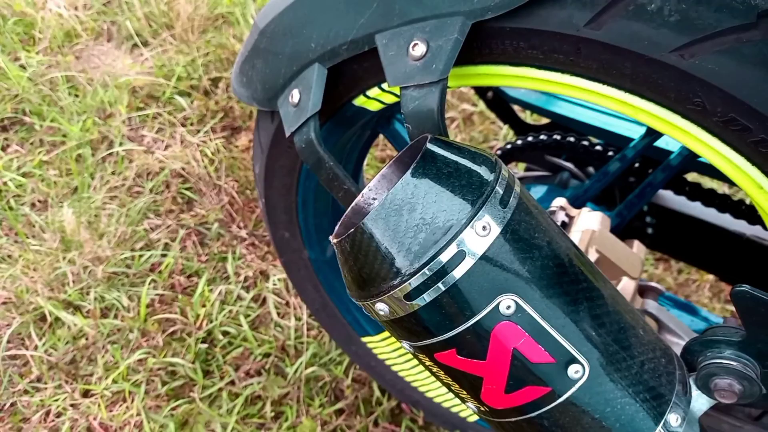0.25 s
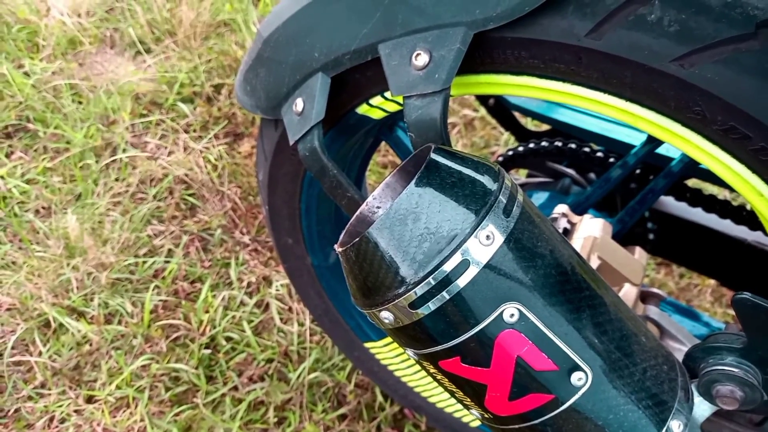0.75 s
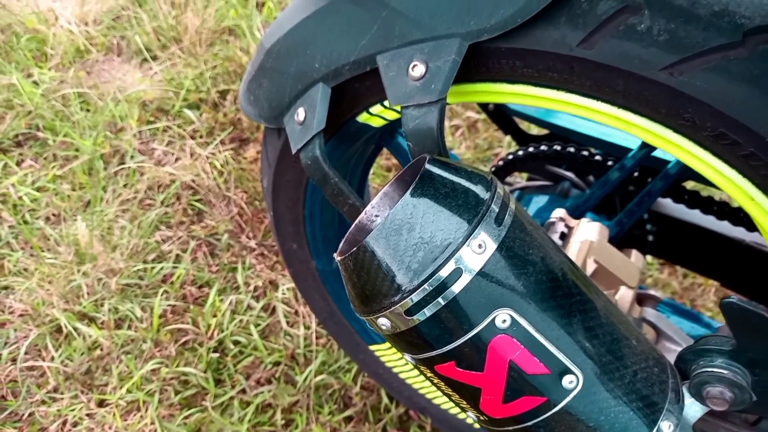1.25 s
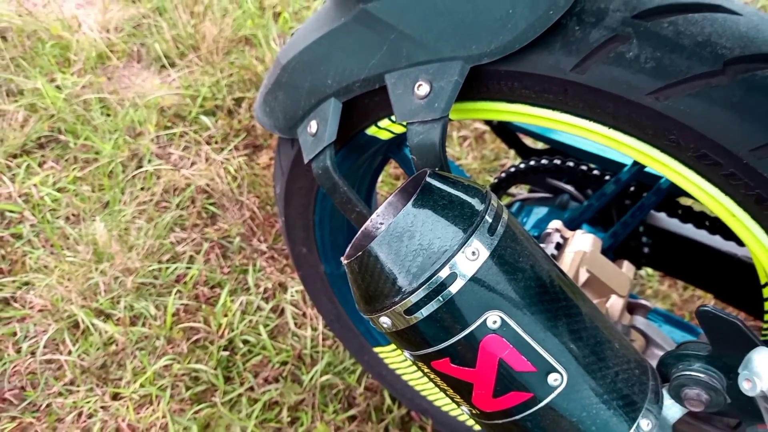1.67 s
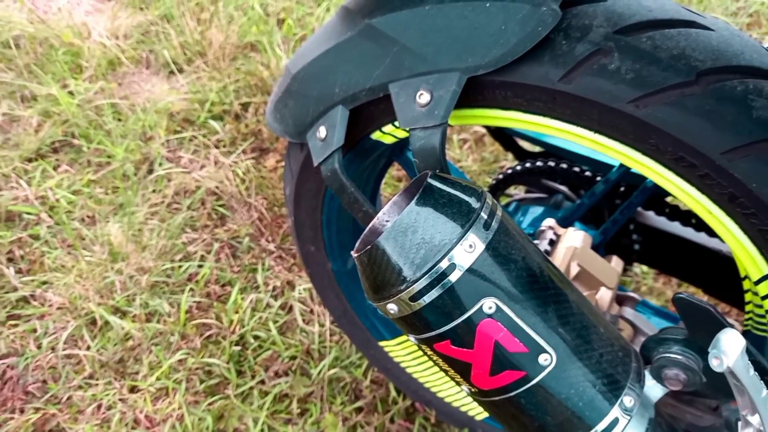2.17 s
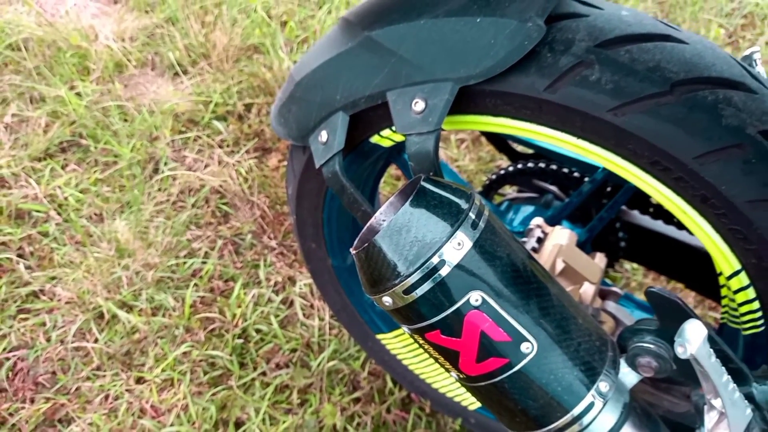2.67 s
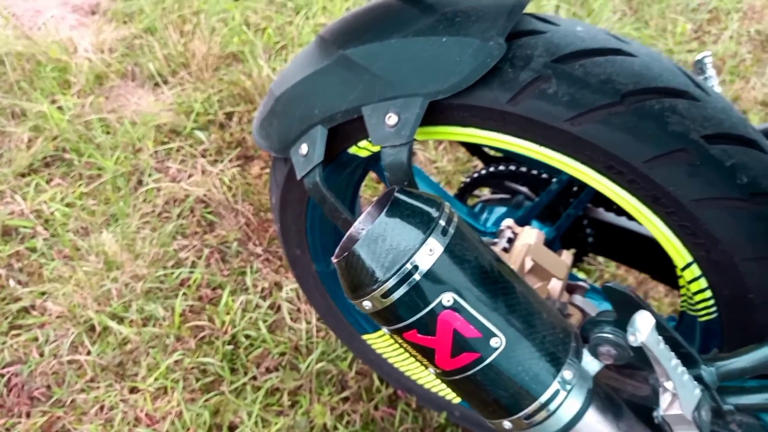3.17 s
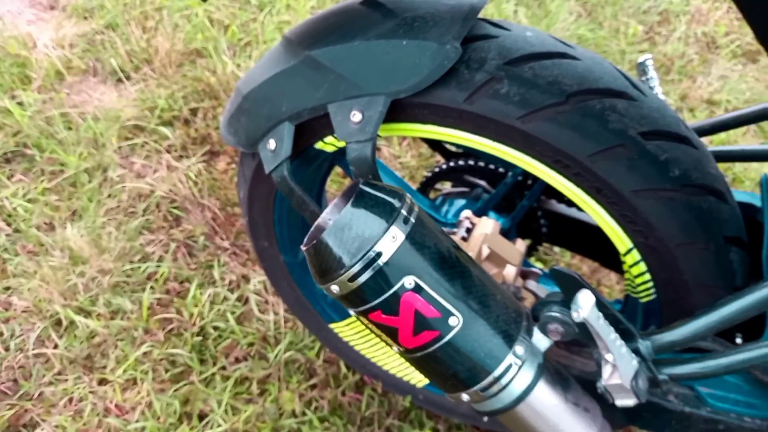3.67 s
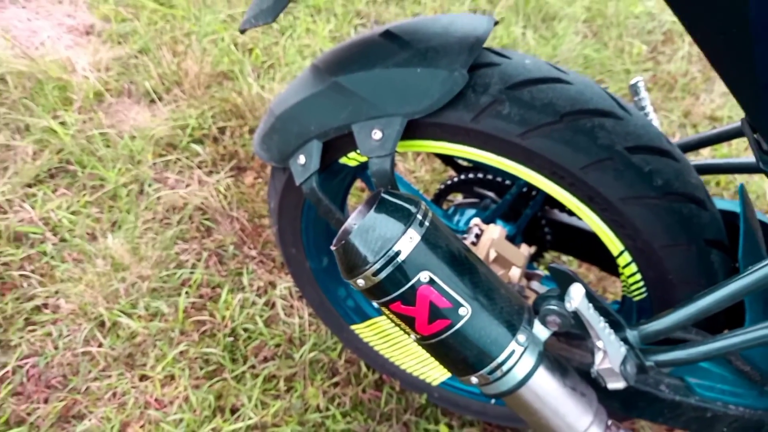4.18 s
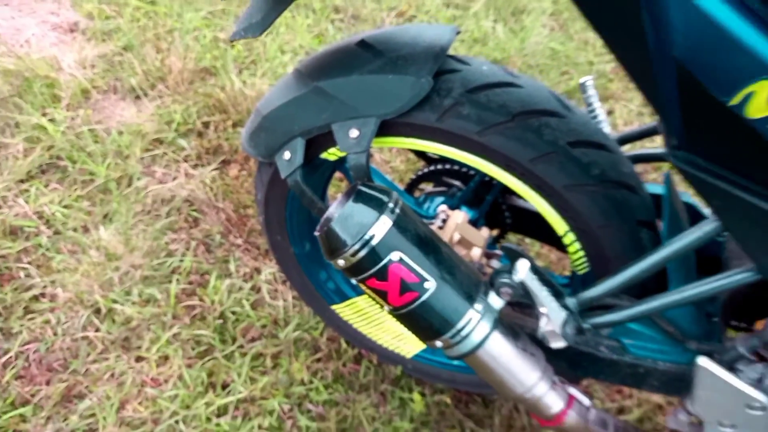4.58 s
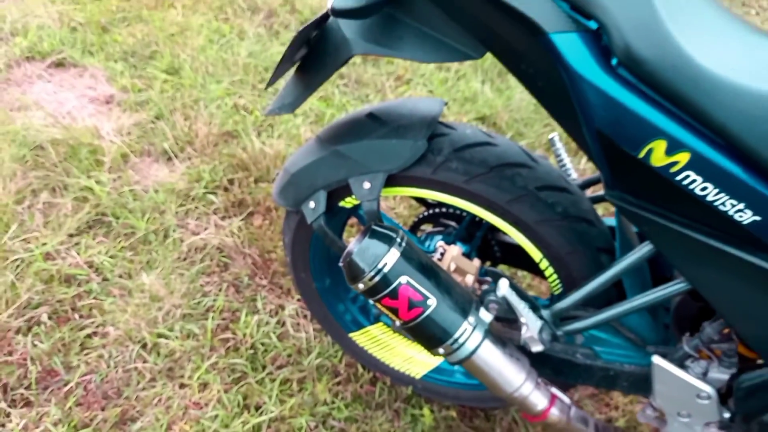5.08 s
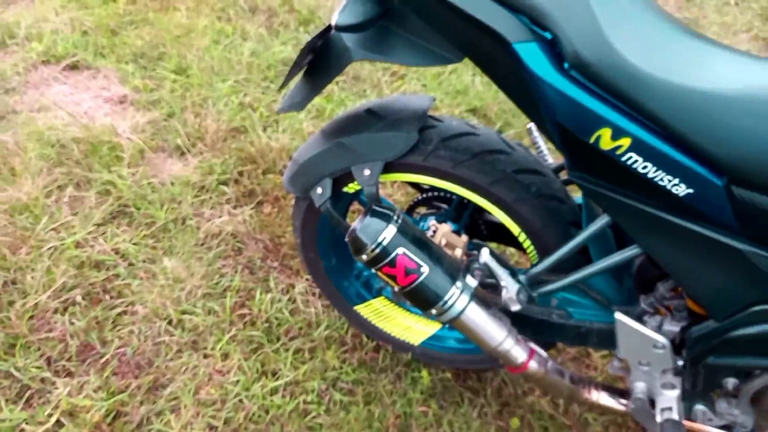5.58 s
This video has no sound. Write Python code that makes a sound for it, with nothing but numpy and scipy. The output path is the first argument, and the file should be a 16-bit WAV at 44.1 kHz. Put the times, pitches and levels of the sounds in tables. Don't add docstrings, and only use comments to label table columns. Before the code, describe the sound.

The throttle has just shut on a single-cylinder motorcycle: quick booming exhaust beats slow over about a second, falter and pop, then become a loping idle of alternating sharp and soft thumps with rising hollow whoops. A stereo phone sits close to the pipe, slightly overloaded by the loudest beats, then drifts toward the ticking engine. Open-air murmur, low wind thuds mostly on the right, and a brief far-off rooster.

```python
import sys
import numpy as np
from scipy import signal
from scipy.fft import rfft, irfft
from scipy.io import wavfile
from scipy.ndimage import uniform_filter1d

SR = 44100
rng = np.random.default_rng(int(sys.argv[2]) if len(sys.argv) > 2 else 0)


def inscribe(sig):
    pcm = np.round(np.clip(np.atleast_2d(sig).T, -1, 1) * 32767)
    wavfile.write(sys.argv[1], SR, pcm.astype(np.int16))


def field_ratio(decibels):
    return 10 ** (np.asarray(decibels, dtype=float) / 20)


N = 257544
TIME = np.arange(N) / SR
LEAD = SR // 20
IDLE_RATE_HZ = 8.5


def curves(table):
    t, *columns = np.transpose(table)
    return [np.interp(TIME, t, column) for column in columns]


def ring(x, hz, width_hz):
    return signal.lfilter(*signal.iirpeak(hz, hz / width_hz, fs=SR), x)


def coloured(points, channels):
    hz, db = np.transpose(points)
    gain = field_ratio(np.interp(np.log(np.fft.rfftfreq(N, 1 / SR) + 1), np.log(hz), db))
    x = irfft(rfft(rng.standard_normal((channels, N))) * gain, N)
    return x / x.std(axis=1, keepdims=True)


def walk(rate_hz, channels):
    hold = int(SR / rate_hz)
    steps = np.repeat(rng.standard_normal((channels, N // hold + 1)), hold, axis=1)
    return 2.52 * uniform_filter1d(steps, hold)[:, :N]


def puffs(times, sizes, rise_ms, fall_ms):
    out = np.zeros(N + SR)
    ms = np.arange(SR // 12) * 1000 / SR
    for t, size, rise, fall in np.broadcast(times, sizes, rise_ms, fall_ms):
        i = max(int(t * SR) + LEAD, 0)
        out[i:i + len(ms)] += size * (1 - np.exp(-ms / rise)) ** 2 * np.exp(-ms / fall)
    return out[:N + LEAD]


def fade(start_s, end_s, edge_s):
    return np.clip(np.minimum(TIME - start_s, end_s - TIME) / edge_s, 0, 1)


def strokes():
    # t/s, rate/Hz
    coast = [
        (-.05, 35.845),
        (.3, 29.218),
        (.55, 24.641),
        (.75, 21.388),
        (.95, 18.665),
        (1.2, 15.377),
    ]
    # t/s, outflow size, decay/ms, shutting surge
    load = [(-.03, 1.9, 3.3, 2.2), (0, 1.3, 4.2, .85), (.03, 1.68, 4.8, 1.15), (.28, 1.22, 6.1, 1.1),
            (.46, 1.87, 8.3, 1.24), (.555, 2.5, 9.4, 1.35), (.62, 2.21, 9.1, 1.17), (.754, .8, 6.1, .38),
            (.802, .18, 3.7, -.52), (.851, 1.73, 8.5, 0), (.901, 1.35, 9.5, .55), (.954, 1.65, 8.7, .35),
            (1.125, 1.0, 8.0, .58), (1.19, 1.0, 8.0, .56)]
    # opens t/s, outflow size, shutting surge
    unburnt = [(1.2535, .87, .61), (1.3224, 1.03, .73), (1.3934, .73, .76), (1.4707, 1.32, .73),
               (1.5505, .6, .5), (1.6379, .89, .43), (1.7257, .04, .27), (1.8287, .52, .32),
               (2.047, .15, .24), (2.2877, .09, .2), (2.7806, .88, .36), (3.0143, .71, .54),
               (3.2476, 1.89, .57), (3.4824, 1.67, .55), (3.719, .77, .32), (3.9522, 1.32, .49),
               (4.5652, 1.6, .27), (4.8112, 1.22, .4), (5.0544, 1.06, .28), (5.3054, 1.36, .29),
               (5.5485, 1.22, .27), (5.7897, 1.2, .55)]
    # opens t/s, outflow size
    fired = [(1.9324, .55), (2.1657, .85), (2.4133, 1.12), (2.5376, .65), (2.6666, 1.42), (2.8983, 1.86),
             (3.1335, 2.31), (3.3679, 2.43), (3.6014, 1.85), (3.8402, 1.98), (4.0683, .91), (4.1944, 1.26),
             (4.3186, .84), (4.4433, 1.26), (4.6969, 1.34), (4.9306, 1.31), (5.1853, 1.22), (5.4331, 1.16),
             (5.67, 1.18)]
    first_stroke_cycles = .806
    stumble_s, stumble_suck = .7987, .57
    fired_decay_ms, unburnt_decay_ms = 1.15, 10.2
    slow_share, fast_share, fired_share = .271, .196, .277

    grid = np.arange(coast[0][0], coast[-1][0], 1e-4)
    cycles = np.cumsum(np.interp(grid, *np.transpose(coast))) * 1e-4
    at = np.interp(np.arange(first_stroke_cycles, cycles[-1]), cycles, grid)
    at = np.where(abs(at - stumble_s) < .01, stumble_s, at)
    load_s, *load_columns = np.transpose(load)
    coasting = [at, *(np.interp(at, load_s, column) for column in load_columns)]

    at, size, surge = np.transpose(unburnt)
    fall = unburnt_decay_ms - 1.5 * size - 2.2 * np.clip(1.75 - at, 0, 1)
    slow = [at, size, np.minimum(fall, 4 + 18 * size), surge]

    at, size = np.transpose(fired)
    hot = [at, size, fired_decay_ms + 0 * at, .24 + .13 * size]

    rows = np.hstack([coasting, slow, hot])
    opens, size, fall, surge = rows[:, np.argsort(rows[0])]
    is_fired = fall < 2
    gaps = np.diff(opens)
    rate = 1 / np.where(is_fired, np.r_[gaps, gaps[-1]], np.r_[gaps[0], gaps])
    share = np.clip(slow_share - .0078 * (rate - 15), fast_share, slow_share)
    open_ms = 1000 * np.where(is_fired, fired_share, share) / rate
    cold_suck = .36 * size + .3 * np.tanh((rate - IDLE_RATE_HZ) / 10)
    suck = np.where(is_fired, .17 - .32 * size, cold_suck)
    suck = np.where(opens == stumble_s, stumble_suck, suck)
    return opens, size, fall, open_ms, surge, suck, rate


def exhaust():
    # f/Hz, width/Hz, signed gain
    flow_rings = [(76.4, 22.1, 2.5), (154.8, 33.0, 12.0), (268.5, 25.9, -19.9), (365.2, 81.8, 13.3),
                  (388.7, 32.1, -18.5)]
    # f/Hz, width/Hz, signed gain
    edge_rings = [(154.5, 31.5, 7.0), (286.9, 30.6, -22.7), (387.1, 84.9, 6.8), (654.4, 147.1, -6.3)]
    # f/Hz, width/Hz, level/dB
    shell = [(173, 74, -10.5), (351.3, 40, -10), (435, 17, -5.5), (684, 120, -21), (676, 170, -24.5)]

    opens, size, fall, open_ms, surge, suck, rate = strokes()
    shuts = opens + open_ms / 1000
    cold_surge = surge * (fall > 2)
    flow = puffs(opens, size, 1.11 + .65 * fall, fall)
    flow += puffs(shuts, surge, 6.79, 8.98)
    edges = puffs(opens - .0003, suck, 1.69, 1.69)
    edges += puffs(shuts + .0037, .62 * cold_surge - .56 * suck, 2.59, 2.59)
    edges += puffs(shuts + .0035, .25 * np.exp(-size / .25), 1.8, 2.4)
    boom = sum(gain * ring(flow, hz, width) for hz, width, gain in flow_rings)
    boom = boom + sum(gain * ring(edges, hz, width) for hz, width, gain in edge_rings)

    speed = rate / IDLE_RATE_HZ
    open_hit, shut_hit = field_ratio(1.5 * rng.standard_normal((2, len(opens)))) * [speed ** .31, .6 * speed ** .1]
    raps = puffs(opens + .0022, .15 * (suck + .14 * size) * open_hit, 1.0, .17)
    raps += puffs(shuts + .0028, .97 * (cold_surge + .3 * size) * shut_hit, 1.0, .58)
    raps = uniform_filter1d(raps, size=30)
    snap = sum(field_ratio(db + 26.5) * ring(raps, hz, width) for hz, width, db in shell)
    return boom[LEAD:], snap[LEAD:]


def chamber(boom):
    resonance_hz, q = 85.59, 5.79
    w, damping = 2 * np.pi * resonance_hz / SR, 1 / q
    rumble_cut = signal.bilinear([1, 0, 0], [1, damping * w * SR, (w * SR) ** 2], SR)
    return signal.lfilter(*rumble_cut, signal.lfilter(*rumble_cut, boom))


def whoop():
    from_hz, fired_to_hz, coasting_to_hz, glide_s = 280, 521.5, 457, .020
    level_db, overtone, overtone_db = -22.5, 1.52, -4.5
    heat_left, cooling_s = 1.2, .25

    times, size, fall = strokes()[:3]
    fired = fall < 2
    heat = np.where(fired, 1, heat_left * np.exp(-times / cooling_s) + .12)
    last = np.searchsorted(times, TIME) - 1
    since = TIME - times[last]
    top_hz = np.where(fired, fired_to_hz, coasting_to_hz)[last]
    lag = (top_hz - from_hz) * glide_s * (1 - np.exp(-since / glide_s))
    phase = 2 * np.pi * (top_hz * since - lag)
    hot = np.exp(-TIME / (2 * cooling_s))
    phase += .4 * (1 - hot) * walk(60, channels=1)[0]
    tone = np.sin(phase) + field_ratio(overtone_db) * (hot + .15) * np.sin(overtone * phase)
    swell = puffs(times + .0048, heat * size, 8.8, 14.15)[LEAD:]
    return swell * field_ratio(level_db + 2.3 * (1 - hot) * walk(120, channels=2)) * tone


def pops():
    # t/s, level/dB
    bursts = [
        (.812, -30.5),
        (.905, -23),
        (0.96, -33),
    ]
    times, db = np.transpose(bursts)
    colour = [(150, -29.5), (380, 3.5), (900, -15.5), (2500, -27.5), (9000, -46.5)]
    return 2.5 * puffs(times, field_ratio(db), 4.2, 6.1)[LEAD:] * coloured(colour, channels=1)


def effort():
    opens, size, fall, *_, rate = strokes()
    force = uniform_filter1d((size + .2) * (1 + 1.5 / fall), size=3)

    def smooth_db(values):
        return 20 * np.log10(uniform_filter1d(np.interp(TIME, opens, values), SR // 5))

    force_db, speed_db = smooth_db(force), smooth_db(rate / IDLE_RATE_HZ)
    return -78 + .93 * force_db + 1.32 * speed_db, -56.5 + 1.04 * force_db + 1.04 * speed_db


def gated(gate, db, points, flicker_db):
    gate_rms = np.sqrt(uniform_filter1d(gate ** 2, SR // 4))
    level = field_ratio(db + flicker_db * walk(300, channels=2))
    return level * gate / gate_rms * coloured(points, channels=2)


def valve_gear(chatter_db):
    modes = [(2260, 490, -.5), (3410, 85, -3.5), (4320, 300, -13), (6500, 550, -19)]  # f/Hz, width/Hz, level/dB
    ticks = (rng.random((2, N)) < 250 / SR) * rng.standard_normal((2, N))
    head = 0
    for hz, width, db in modes:
        rung = ring(ring(ticks, hz, width), hz, 3 * width)
        head = head + field_ratio(db + chatter_db * (hz > 3000)) * rung
    return head / head.std()


def air(jet_db, intake_db, swirl_db, chatter_db):
    jet_colour = [(1000, -42.5), (3000, -6), (6000, -5), (8000, -7), (12000, -6), (14500, -9), (16000, -16.5)]
    swirl_colour = [(200, -43.5), (450, 1), (800, 1.5), (1300, -10.5), (2500, -15), (8000, -64.5)]
    gulp_colour = [(400, -38.5), (1200, 1.5), (2400, -4.5), (3500, -7), (6300, -15), (7600, -27), (9000, -77)]

    opens, size, fall, open_ms = strokes()[:4]
    force = (np.abs(size) + .15) * (1 + 2.9 / fall)
    jet = puffs(opens + .00086, force ** .61, 1.6, 4.7)[LEAD:] + .16
    jet += .046 * puffs(opens + .004, force, 4.0, 30.)[LEAD:]
    swirl = puffs(opens + .0011, force, 3.0, 12.0)[LEAD:] + .3
    draw = force ** .3 * field_ratio(2 * rng.standard_normal(len(opens)))
    gulp = puffs(opens - .00079 * open_ms, draw, .37 * open_ms, .29 * open_ms)[LEAD:] + .06
    out = gated(jet, jet_db + 5.5, jet_colour, 1.0)
    out += gated(swirl, swirl_db - 3.5, swirl_colour, .28)
    out += gated(gulp, intake_db - 2.5, gulp_colour, .5)
    out += field_ratio(intake_db - 9.5) * valve_gear(chatter_db)
    return out * field_ratio(np.array([[.8], [-.8]]))


def wind():
    # f/Hz, level/dB per Hz
    thud_colour = [(35, -19.5), (60, 7), (85, 4), (227, -6), (300, -5.5), (329, -13.5), (396, -13),
                   (443, -16), (1420, -36.5), (5000, -74.5), (6500, -84.5), (11000, -120)]
    # t/s, level/dB
    breeze = [(0, -30), (.22, -31.5), (.36, -48.5), (.78, -46.5), (.9, -32.5), (1.1, -42.5), (2.2, -46),
              (2.9, -33.5), (3.45, -34), (3.88, -27.5), (4.02, -38.5), (4.13, -27.5), (4.85, -27.5),
              (5.2, -25), (5.7, -28), (5.84, -39.5)]
    rasp_colour = [(100, -25), (280, 6), (600, -10), (1400, -24), (3000, -51), (9000, -84.5)]
    left_max_db, gust_db, gust_thud_db = -37, -19, 4
    gust_peak_s, slap_width_s, slap_peak_db, swell_db_per_100ms = 5.03, .022, 8, 7

    off_s = np.abs(TIME - gust_peak_s)
    slap_db = slap_peak_db * np.exp(-(off_s / slap_width_s) ** 2)
    gust = field_ratio(gust_db - swell_db_per_100ms * off_s * 10) * fade(4.86, 5.14, .04)
    right = field_ratio(curves(breeze)[0])
    ports = np.array([np.minimum(field_ratio(left_max_db), right), right + field_ratio(gust_thud_db) * gust])
    out = ports * field_ratio(4.5 + 2.0 * walk(40, channels=2)) * coloured(thud_colour, channels=2)
    rasp = field_ratio(slap_db + 1.8 * walk(150, channels=1)) * coloured(rasp_colour, channels=1)
    out[1] += gust * rasp[0]
    return out


def clicks():
    # t/s, peak/dB
    ticks = [
        (4.1416, -47),
        (4.8703, -39),
    ]
    times, db = np.transpose(ticks)
    colour = [(500, -23.5), (3000, -.5), (9000, -12), (15000, -16.5)]
    return 2 * puffs(times, field_ratio(db), .11, 1.0)[LEAD:] * coloured(colour, channels=2)


def rooster():
    # t/s, f/Hz
    pitch = [
        (1.08, 618),
        (1.2, 639),
        (1.32, 647),
        (1.49, 659),
        (1.9, 642),
        (2.04, 603),
        (2.09, 495),
        (2.12, 467),
    ]
    # multiple, start/s, end/s, level/dB
    partials = [
        (3, 1.47, 2.12, -64),
        (4, 1.08, 2.12, -66.5),
        (4, 1.08, 1.17, -66),
        (4, 2.02, 2.12, -67),
        (6, 1.55, 1.9, -79),
        (7, 1.2, 1.43, -70.5),
        (7, 1.5, 1.9, -82),
    ]
    pitch_hz = curves(pitch)[0] * (1 + .002 * walk(60, channels=1)[0])
    phase = 2 * np.pi * np.cumsum(pitch_hz) / SR
    note = np.zeros(N)
    for multiple, start, end, db in partials:
        level = field_ratio(db + walk(30, channels=1)[0]) * fade(start, end, .022)
        note += level * np.sin(round(multiple) * phase)
    return np.sqrt(2) * note * field_ratio(np.array([[-1.5], [1.5]]))


def open_field():
    # f/Hz, level/dB per Hz
    colour = [(180, -30), (300, -5), (337, -16.5), (461, -11), (581, -24), (708, -21), (877, -26),
              (2440, -33), (3180, -51.5), (3450, -39.5), (15500, -57.5)]
    return field_ratio(-60 + 1.2 * walk(1.3, channels=2)) * coloured(colour, channels=2)


def scene():
    # t/s, intake/dB, left minus right/dB, valve gear chatter/dB
    phone = [
        (0, -45, 0.3, -2),
        (.5, -51.5, 1.5, 0),
        (1.0, -53.5, 0.3, -2),
        (2.1, -54.5, 1.2, -2),
        (3.1, -46, .5, -3.5),
        (4.0, -47.5, 0.2, 5),
        (4.9, -47, -0.5, 6),
        (5.84, -47.5, .2, 5),
    ]
    jet_db, swirl_db = effort()
    intake_db, pan_db, chatter_db = curves(phone)
    boom, snap = exhaust()
    boom = chamber(np.array([boom, field_ratio(-pan_db) * np.roll(boom, 4)]))
    snap = field_ratio(1.0) * np.array([field_ratio(1.5) * snap, np.roll(snap, 8)])
    engine = boom + snap + whoop() + pops() + air(jet_db, intake_db, swirl_db, chatter_db)
    return engine + wind() + clicks() + rooster() + open_field()


def band_limit(x):
    return signal.sosfilt(signal.butter(12, 15700, fs=SR, output="sos"), x)


def record(dry):
    return band_limit(np.clip(dry, -1, 1))


dry = scene()
out = record(dry)
inscribe(out)
```